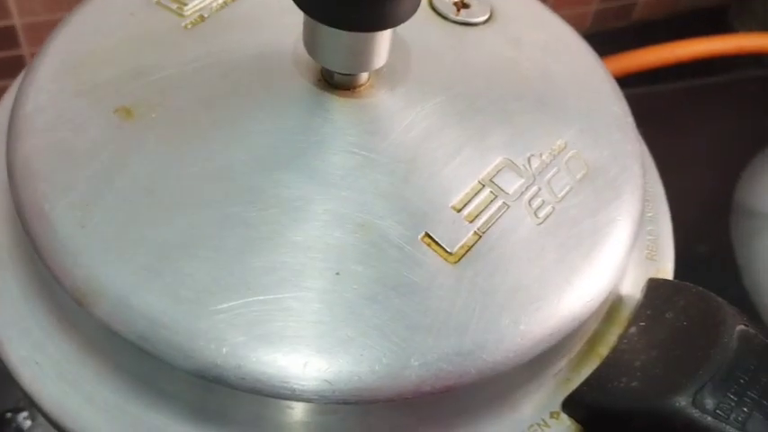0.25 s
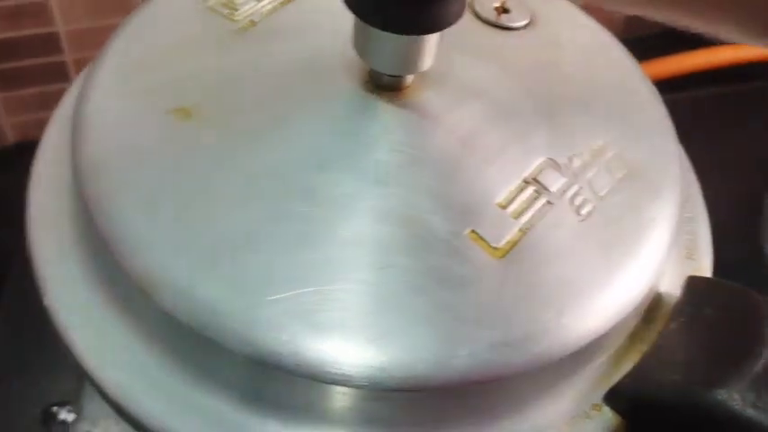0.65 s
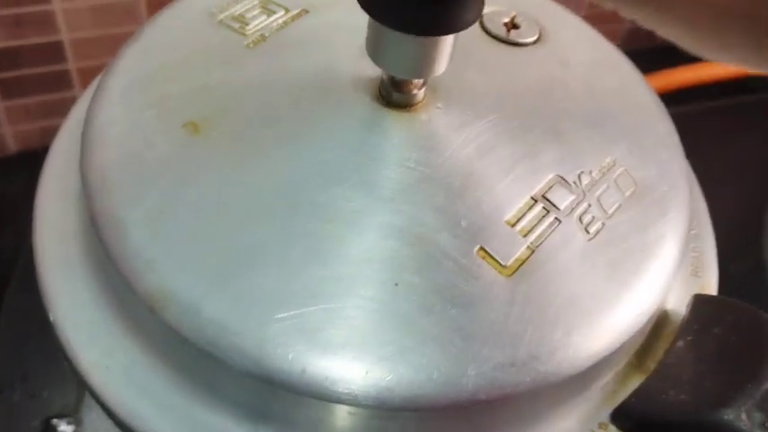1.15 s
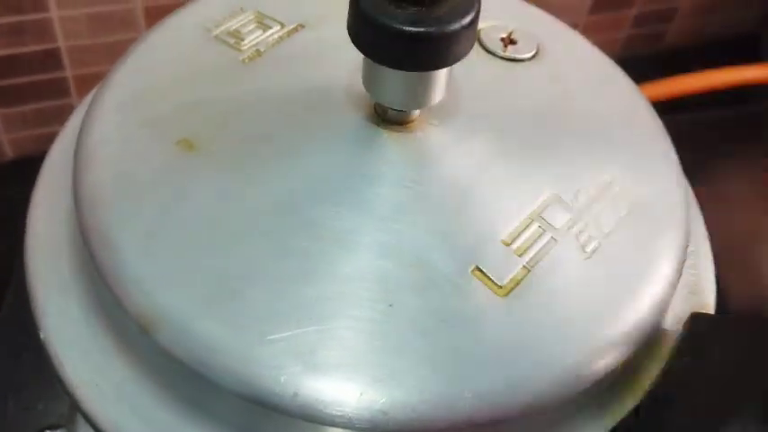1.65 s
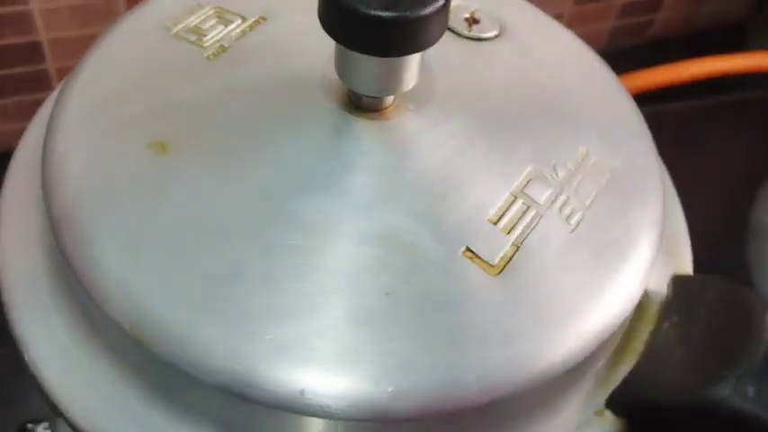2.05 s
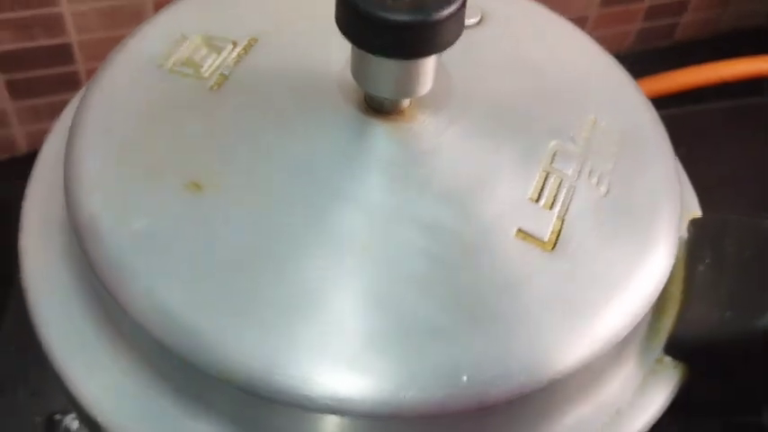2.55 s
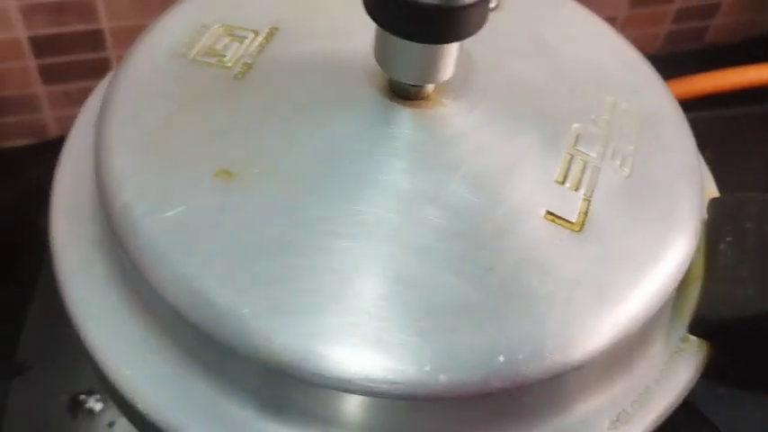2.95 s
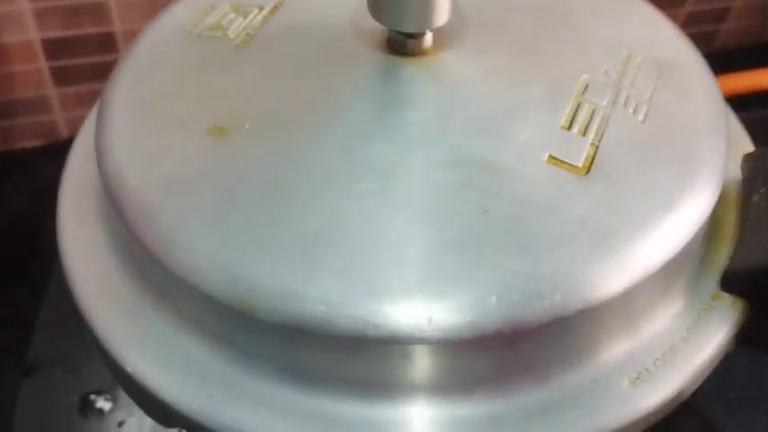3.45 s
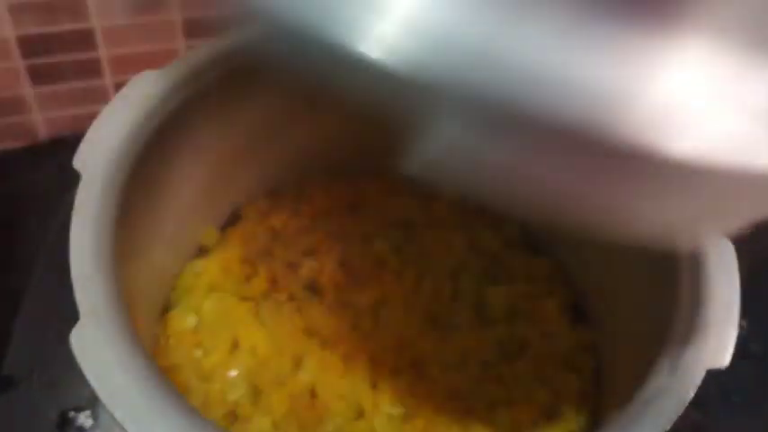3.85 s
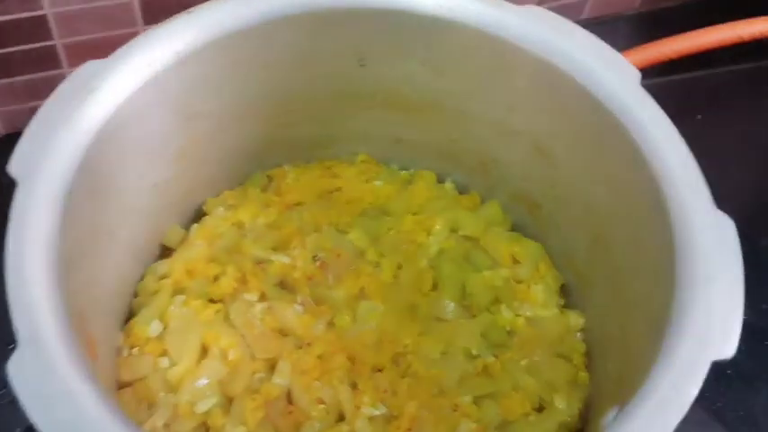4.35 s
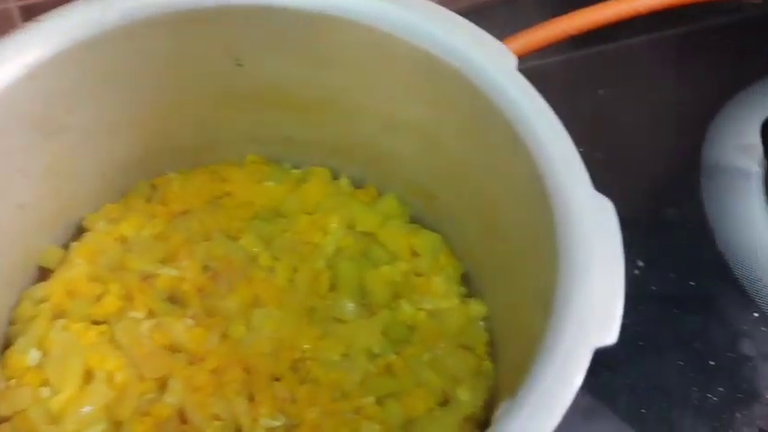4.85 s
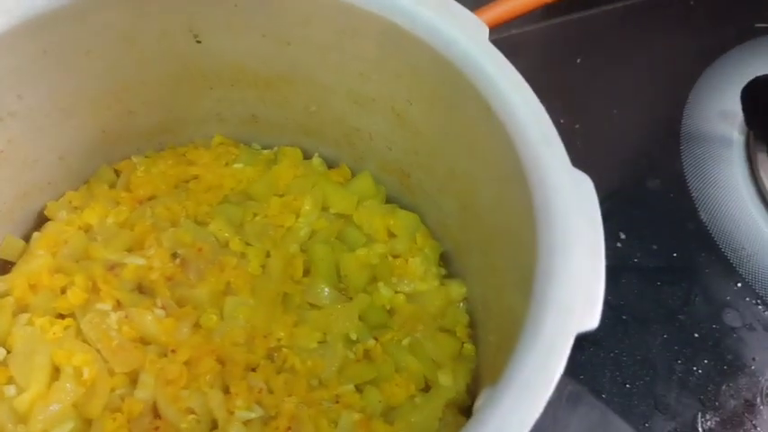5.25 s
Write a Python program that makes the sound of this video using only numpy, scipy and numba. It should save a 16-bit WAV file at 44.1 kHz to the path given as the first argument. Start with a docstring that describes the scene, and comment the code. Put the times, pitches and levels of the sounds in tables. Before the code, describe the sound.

A light metal click releases a bright hiss of steam from a pressure cooker, fading and ending in under a second with a clink. Ringing clanks follow as the lid is worked loose, the heaviest rocking the pot, with short rubbery groans and soft wisps of steam. Things then go quiet: a few small ticks, a spoon clink, and a knock and gritty scrape of the lid. The sounds are close, over a low kitchen hum.

```python
"""Steam hisses from a pressure cooker: the valve weight is nudged up, a turbulent jet sags as the pot
empties, and the weight drops back. The lid twists on its groaning rubber gasket, clanks free,
drips, and is set down with a scrape. Blows ring the metal; heavy ones rock the pot on the stove.
Wisps of steam seep out, a spoon clinks, and the tiled kitchen hums quietly."""
import sys
import numpy as np
from scipy import signal
from scipy.fft import rfft, irfft
from scipy.io import wavfile
from numba import njit

SR = 44100
rng = np.random.default_rng(int(sys.argv[2]) if len(sys.argv) > 2 else 0)


def transcribe(signal):
    """Save signal, clipped to [-1, 1], as a 16-bit WAV file at the path in sys.argv[1]."""
    frames = np.atleast_2d(signal).T
    limited = np.clip(frames, -1, 1)
    pcm = np.round(limited * 32767).astype(np.int16)
    wavfile.write(sys.argv[1], SR, pcm)


N = 242991
TIME = np.arange(N) / SR
AGE = np.arange(SR) / SR  # seconds since a blow


def undb(db):
    """Decibels to gain."""
    return 10 ** (np.asarray(db) / 20)


def unit(x):
    """Scale to rms 1."""
    return x / np.sqrt(np.mean(x ** 2))


def punch(x):
    """Scale a blow to rms 1 over its first 30 ms."""
    return x / np.sqrt(np.mean(x[:1323] ** 2))


def add(out, start_s, x):
    """Mix x into out."""
    i = int(start_s * SR)
    out[i:i + len(x)] += x[:N - i]


def fade(t60_s):
    """Exponential decay."""
    return np.exp(-np.log(1000) * AGE / t60_s)


def ramp(start_s, length_s):
    """Linear rise from 0 to 1."""
    return np.clip((TIME - start_s) / length_s, 0, 1)


def walk(rate_hz):
    """Random wander, rms 1."""
    knots = rng.standard_normal(N // 20)
    return unit(np.interp(TIME * rate_hz, np.arange(len(knots)), knots))


def colour(x, points):
    """Minimum-phase filter through (Hz, dB) points."""
    hz, db = np.transpose(points)
    grid_hz = np.fft.rfftfreq(4096, 1 / SR)
    gain = undb(np.interp(np.log(grid_hz + 1), np.log(hz), db))
    cepstrum = irfft(np.log(gain))
    cepstrum[1:len(grid_hz)] *= 2
    cepstrum[len(grid_hz):] = 0
    impulse = irfft(np.exp(rfft(cepstrum)))
    return signal.fftconvolve(x, impulse)[:len(x)]


def band(x, hz, kind):
    """Butterworth filter."""
    return signal.sosfilt(signal.butter(3, hz, kind, fs=SR, output="sos"), x)


@njit
def resonate(x, hz, width_hz):
    """State-variable band-pass, one centre per sample."""
    y, band_state, low_state = np.empty(len(x)), 0., 0.
    for i in range(len(x)):
        g, damping = np.tan(np.pi * hz[i] / SR), width_hz / hz[i]
        v = (band_state + g * (x[i] - low_state)) / (1 + g * (g + damping))
        band_state = 2 * v - band_state
        low_state += 2 * g * v
        y[i] = damping * v
    return y


def tuned(x, hz, width_hz):
    """Two band-passes in series; the centre may move."""
    centre_hz = hz * np.ones(len(x))
    once = resonate(x + 1e-18, centre_hz, float(width_hz))
    return resonate(once, centre_hz, float(width_hz))


def noise_band(hz, width_hz):
    """Resonant noise, rms 1."""
    return unit(tuned(rng.standard_normal(N), hz, width_hz))


def ring(modes, scatter_db, blur_hz):
    """Decaying modes; each blow weights them anew, loose contact blurs their pitch."""
    hz, db, t60_s = np.transpose(modes)
    gains = undb(db + scatter_db * rng.standard_normal(len(hz)))
    drift = np.cumsum(rng.standard_normal((len(hz), SR)), axis=1) * np.sqrt(2 * np.pi * blur_hz / SR)
    return punch(sum(gain * np.sin(2 * np.pi * f * AGE + phase) * fade(t)
                     for f, gain, t, phase in zip(hz, gains, t60_s, drift)))


def tick(hz, width_hz):
    """A brief contact sounds one resonance; narrower rings longer."""
    burst = rng.standard_normal(SR) * fade(t60_s=50 / width_hz)
    return punch(tuned(burst, hz, width_hz))


def steam_jet(open_s=0.8433, rise_s=.047, seat_s=1.52, open_db=-8.5, sag_db=16, shut_db_per_s=224):
    """A turbulent jet sputters, sags and changes colour as the pressure falls."""
    # Spectra at full and low pressure. Each row: frequency in Hz, density in dB.
    full_colour = [(100, -41.5), (500, -34), (1100, -36.5), (1700, -31), (3700, -25.5), (5200, -18.5),
                   (6200, -17.5), (7500, -7), (8800, -2), (9600, -4), (10500, -15), (11800, -20.5),
                   (13000, -20.5), (15800, -33)]
    weak_colour = [(100, -33.5), (400, -36), (1000, -28.5), (2000, -24), (3700, -19.5), (4300, -18.5),
                   (5300, -14), (6200, -14), (7600, -6), (9100, 1), (10300, -9), (11700, -19), (13000, -17),
                   (15800, -33)]
    # Vent and weight cap. Each row: centre in Hz, width in Hz, dB at full pressure, dB at low pressure.
    vent_modes = [(1514, 200, -35.5, -28.5), (2050, 430, -34, -26), (4130, 330, -27, -20),
                  (5123, 420, -19, -19), (7570, 150, -14.5, -17.5), (8670, 200, -10, -12.5),
                  (9130, 380, -5.5, -8.5)]
    # Fall from full to low pressure: start and end in seconds.
    pressure_fall_s = [0.92, 1.2]
    pressure = np.interp(TIME, pressure_fall_s, [1, 0])
    full, weak = (unit(colour(rng.standard_normal(N), c)) for c in (full_colour, weak_colour))
    jet = np.sqrt(pressure) * full + np.sqrt(1 - pressure) * weak
    for hz, width_hz, full_db, weak_db in vent_modes:
        jet += undb(weak_db + pressure * (full_db - weak_db)) * noise_band(hz, width_hz)
    wide_s = open_s + rise_s
    spent = np.maximum(TIME - wide_s, 0) / (seat_s - wide_s)  # 0 fully open, 1 as the weight seats
    jet_db = open_db - sag_db * spent ** 1.33 - shut_db_per_s * np.maximum(TIME - seat_s, 0)
    sputter_db = 0.25 * walk(350) + .4 * walk(30)
    jet = unit(jet) * undb(jet_db + sputter_db)
    # The hollow under the sinking weight rings lower as its gap closes.
    open_hz, shut_hz = 1800, 390
    gap_hz = open_hz * (shut_hz / open_hz) ** (np.minimum(spent, 1) ** 1.8)
    hollow = noise_band(gap_hz, width_hz=220) * undb(np.minimum(jet_db - 30.5, -46))
    return ramp(open_s, rise_s) ** 4.6 * (jet + hollow)


def steam_seep():
    """Wisps escape past the weight, past the gasket, from under the lid and off the hot food."""
    # Each row: start of decay in seconds, level there in dB, rise in dB/s, fall in dB/s.
    leaks = [(1.556, -55, -0.5, 72), (2.73, -45, 27, 63.5), (3.82, -49, 335, 65), (3.7, -63, 4.5, 3)]
    # Seep spectrum. Each row: frequency in Hz, density in dB.
    seep_colour = [(400, -6.5), (1300, -9.5), (2200, -15), (2800, -12), (3600, -17.5), (5500, -10.5),
                   (7000, -7.5), (8800, 0.5), (10700, -12.5), (12500, -17), (15800, -19)]
    power = sum(undb(db - np.maximum(rise * (s - TIME), fall * (TIME - s))) ** 2
                for s, db, rise, fall in leaks)
    hiss = unit(colour(rng.standard_normal(N), seep_colour))
    return hiss * np.sqrt(power) * undb(1.4 * walk(18))


def metal_knocks(body_hz=900, treble_hz=4800, crack_db=5, chatter_db=1.5):
    """Weight, lid and pot collide: a crack, a chattering wash of shell modes and a few longer rings."""
    # Each row: start in seconds, body, middle and treble levels in dB, ring over wash in dB.
    knocks = [(.772, -36.5, -33.5, -31, -11.5), (1.515, -45, -43, -33.5, 6),
              (1.5395, -38.5, -28.5, -22.5, -11), (2.229, -59, -56, -52, -12),
              (2.284, -57, -51.5, -64, -19), (2.3144, -37.5, -37, -28.5, -9.5),
              (2.58, -31, -37, -35.5, -13.5), (2.756, -23.5, -36, -38.5, -10), (2.767, -22, -20, -21, -1.5),
              (2.778, -22, -21, -14.5, -8), (2.797, -23, -44, -19, -7.5), (2.822, -39.5, -24.5, -26.5, -5),
              (3.1143, -45.5, -53.5, -59.5, -20), (3.239, -52, -43.5, -51, -24),
              (3.2573, -32.5, -37, -43.5, -13), (3.2922, -48, -47, -43.5, -9),
              (3.341, -38, -34.5, -36, 1.5), (3.369, -33, -36, -44, -19), (3.567, -27, -22, -25, -16),
              (5.3545, -41.5, -33, -43, -11.5), (5.4204, -49, -35, -68, -31)]
    # Wash spectrum. Each row: frequency in Hz, density in dB.
    wash_colour = [(80, -8), (240, 2), (520, 3.5), (800, -0.5), (1100, -2), (1450, -3), (2100, -1.5),
                   (2800, -2.5), (3800, -11.5), (5300, -13.5), (6600, -6.5), (8400, -5), (10500, -16.5),
                   (15800, -32.5)]
    # Pot and lid modes. Each row: frequency in Hz, level in dB, T60 in seconds.
    pot_modes = [(228.5, -9, 0.38), (520, -0.5, 0.29), (654, -1.5, .25), (1120, -12.5, 0.13),
                 (1526, -5.5, 0.11), (2007, -3.5, 0.25), (2140, -9.5, 0.24), (2816, -3.5, 0.13),
                 (3385, -4.5, 0.17), (4380, -9, 0.29), (4475, -11, 0.33), (6000, -10, .15), (6450, -10, .2),
                 (7870, -7.5, 0.11), (8086, -9, .2), (12500, -15.5, .18)]
    out = np.zeros(N)
    for start_s, body_db, middle_db, treble_db, ring_db in knocks:
        chatter = fade(t60_s=.19) * undb(chatter_db * walk(400)[:SR])
        crack = undb(crack_db) * fade(t60_s=0.013)
        wash = colour(rng.standard_normal(SR) * (chatter + crack), wash_colour)
        # Each spot on the shell favours its own mode clusters.
        clusters = [(hz, 2.5 * rng.standard_normal()) for hz in np.geomspace(600, 16000, 64)]
        tones = ring(pot_modes, scatter_db=2, blur_hz=26)
        shell = punch(colour(wash, clusters)) + undb(ring_db) * tones
        # Place and hardness of the contact weight the registers.
        body = punch(band(shell, body_hz, "low")) * undb(body_db)
        middle = punch(band(shell, [body_hz, treble_hz], "band")) * undb(middle_db)
        treble = punch(band(shell, treble_hz, "high")) * undb(treble_db)
        add(out, start_s, body + middle + treble)
    return out


def stove_thumps(attack_s=0.011):
    """Heavy blows rock the pot on the stove."""
    # Each row: start in seconds, level in dB.
    thumps = [(2.58, -37), (2.765, -10.5), (3.258, -41.5), (3.363, -40), (5.358, -36), (5.427, -36.5),
              (5.4458, -34)]
    # Each row: frequency in Hz, level in dB, T60 in seconds.
    stove_modes = [(97.6, 3.5, 0.3), (103.6, -10.5, 0.59), (47, -11, 0.42), (122.2, -11, 0.56),
                   (233.7, -11.5, 0.49)]
    boom = ring(stove_modes, scatter_db=0, blur_hz=0) * np.minimum(AGE / attack_s, 1)
    out = np.zeros(N)
    for start_s, db in thumps:
        add(out, start_s, undb(db) * boom)
    return out


def hollow_rings_and_groans(attack_s=.003, release_s=0.01, sag_per_s=0.38, waver=0.034, overtone_db=-24):
    """Short, nearly pure sagging tones: two low hollow rings after knocks, then gasket groans."""
    # Each row: start in seconds, length in seconds, pitch in Hz, level in dB.
    tones = [(1.535, 0.074, 338.7, -28), (2.315, 0.061, 318, -41.5), (2.637, .06, 583.5, -36.5),
             (3.122, 0.11, 623, -51), (3.143, 0.011, 615, -33.5), (3.226, 0.042, 324, -30),
             (3.283, .045, 351, -35.5), (3.342, 0.013, 397.5, -10.5), (3.392, .05, 410.7, -27),
             (3.567, 0.062, 419.6, -23), (3.568, 0.087, 523, -26)]
    out = np.zeros(N)
    for start_s, length_s, hz, db in tones:
        pitch_hz = hz * np.exp(-sag_per_s * AGE) * (1 + waver * walk(220)[:SR])
        phase = 2 * np.pi * np.cumsum(pitch_hz) / SR
        tone = np.sqrt(2) * (np.sin(phase) + undb(overtone_db) * np.sin(3 * phase))
        judder_db = 2.5 * walk(180)[:SR]
        gate = np.minimum(AGE / attack_s, 1) * np.exp(-np.maximum(AGE - length_s, 0) / release_s)
        fade_db_per_s = 753 * 2 ** (db / 12)  # louder tones fade sooner
        add(out, start_s, gate * undb(db - fade_db_per_s * AGE + judder_db) * tone)
    return out


def contact_ticks():
    """Light contacts, one resonance each."""
    # Each row: start in seconds, level in dB, centre in Hz, width in Hz.
    contacts = [(2.3146, -36.5, 10000, 9000), (2.517, -49.5, 9100, 6000), (4.1703, -43.5, 8070, 3780),
                (4.171, -53.5, 2020, 2033), (4.485, -59, 9620, 2500), (4.517, -48.5, 10840, 794),
                (4.561, -59, 10930, 700), (4.58, -61.5, 3080, 500)]
    out = np.zeros(N)
    for start_s, db, hz, width_hz in contacts:
        add(out, start_s, undb(db) * tick(hz, width_hz))
    return out


def lid_drips():
    """Condensed water drips off the lifted lid."""
    # Each row: start in seconds, level in dB.
    drips = [(3.952, -67), (3.972, -65), (4.016, -63)]
    out = np.zeros(N)
    for start_s, db in drips:
        add(out, start_s, undb(db) * tick(hz=5430, width_hz=4300))
    return out


def midrange_rings():
    """Short midrange ring, strongest near 2 kHz, sounding with four of the metal knocks."""
    # Each row: start in seconds, level in dB.
    onsets = [(.773, -44.5), (1.515, -35), (1.54, -29.5), (2.819, -24.5)]
    # Each row: frequency in Hz, level in dB, T60 in seconds.
    midrange_modes = [(754, -10.5, .13), (985, -8, .14), (2043, 0.5, .1), (2820, -4, .1)]
    out = np.zeros(N)
    for start_s, db in onsets:
        add(out, start_s, undb(db) * ring(midrange_modes, scatter_db=0.5, blur_hz=70))
    return out


def metal_rubs():
    """Soft rubs and thin squeaks: half-sine swells of resonant noise."""
    # Each row: start in seconds, length in seconds, level in dB, centre in Hz, width in Hz.
    rubs = [(0, 0.066, -54.5, 5560, 80), (0, 0.14, -70.5, 2780, 150), (0.324, 0.05, -63.5, 2900, 3000),
            (2.045, 0.36, -60.5, 377, 120), (3.728, 0.31, -54, 582, 283), (4.84, 0.072, -52, 2970, 1400)]
    return sum(undb(db) * np.sin(np.pi * ramp(start_s, length_s)) * noise_band(hz, width_hz)
               for start_s, length_s, db, hz, width_hz in rubs)


def spoon_clink(crack_db=-4.0):
    """A struck spoon rings over a short crack."""
    # Each row: start in seconds, level in dB.
    clinks = [(4.879, -35)]
    # Each row: frequency in Hz, level in dB, T60 in seconds.
    spoon_modes = [(2060, -6, 0.18), (2140, -3.5, 0.086), (2740, -0.5, 0.097), (2795, -10, 0.075),
                   (4370, -13, 0.081), (6380, 2.5, 0.078), (8100, -1, .12), (9300, -4.5, 0.12),
                   (10140, -10.5, 0.14), (12200, 0.5, 0.096)]
    out = np.zeros(N)
    for start_s, db in clinks:
        crack = punch(band(rng.standard_normal(SR) * fade(t60_s=0.093), [400, 12000], "band"))
        tone = ring(spoon_modes, scatter_db=1.5, blur_hz=45)
        add(out, start_s, undb(db) * (tone + undb(crack_db) * crack))
    return out


def lid_slide(level_db=-38.5):
    """The lid scrapes grittily on the counter."""
    # Scrape spectrum. Each row: frequency in Hz, density in dB.
    slide_colour = [(200, -46), (316, 12), (450, -2.5), (700, 4.5), (1050, 8.5), (1400, -7), (1750, -5),
                    (2700, 2.5), (3700, -11), (6500, -16), (9900, -7.5), (11000, -18), (15800, -33)]
    grit = rng.standard_normal(N) * undb(2.6 * walk(460))
    return unit(colour(grit, slide_colour)) * undb(level_db) * ramp(start_s=5.42, length_s=0.007)


def kitchen_reverb(x, t60_s=0.29, wet_db=-14, delay_s=.005):
    """Close tiled walls add a short tail."""
    tail = band(rng.standard_normal(SR), 12000, "low") * fade(t60_s) * (AGE > delay_s)
    tail /= np.sqrt(np.sum(tail ** 2))
    return x + undb(wet_db) * signal.fftconvolve(x, tail)[:N]


def room_tone(air_db=-54.5):
    """Low room noise and a wavering hum."""
    # Room spectrum. Each row: frequency in Hz, density in dB.
    room_colour = [(15, -27), (25, 2.5), (74, -16.5), (108, -3.5), (157, -7.5), (212, -23.5), (335, -18.5),
                   (373, -18.5), (545, -22.5), (1100, -26), (2110, -33), (8830, -41.5), (16000, -55)]
    # Each row: frequency in Hz, level in dB.
    hum_tones = [(102.3, -63), (156, -65.5), (183, -68.5)]
    out = unit(colour(rng.standard_normal(N), room_colour)) * undb(air_db + 0.21 * walk(8.1))
    for hz, db in hum_tones:
        amplitude = np.sqrt(2) * undb(db + 0.72 * walk(2.8))
        out += amplitude * np.sin(2 * np.pi * hz * TIME + 0.96 * walk(2.0))
    return out


def scene():
    """Cooker and spoon in the kitchen, mono."""
    cooker = steam_jet() + steam_seep() + metal_knocks() + stove_thumps() + hollow_rings_and_groans()
    small = contact_ticks() + lid_drips() + midrange_rings() + metal_rubs() + spoon_clink() + lid_slide()
    return (kitchen_reverb(cooker + small) + room_tone())[None]


def record(dry):
    """Soft peak limiter, then a steep low-pass."""
    ceiling, cutoff_hz = .95, 15900
    rounded = dry / (1 + (dry / ceiling) ** 8) ** (1 / 8)
    return signal.sosfilt(signal.ellip(10, .2, 70, cutoff_hz, fs=SR, output="sos"), rounded)


dry = scene()
out = record(dry)
transcribe(out)
```